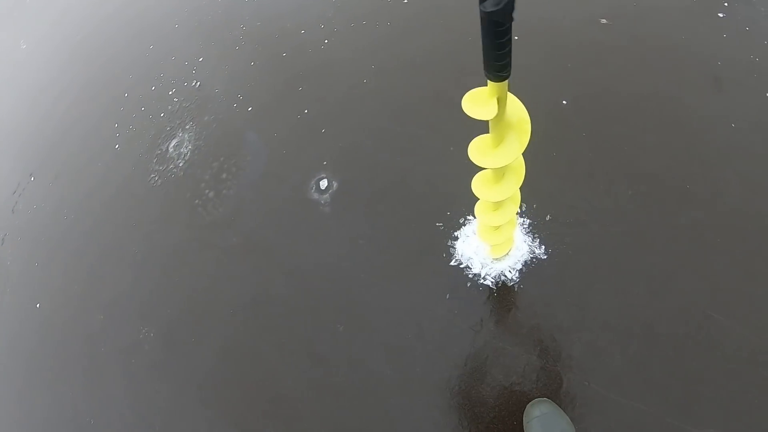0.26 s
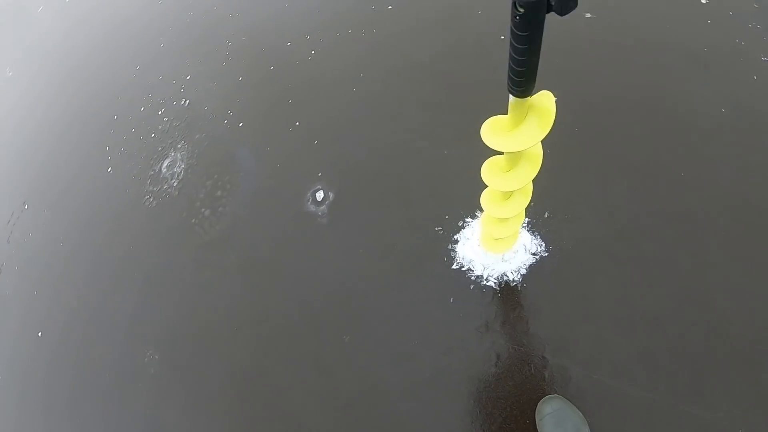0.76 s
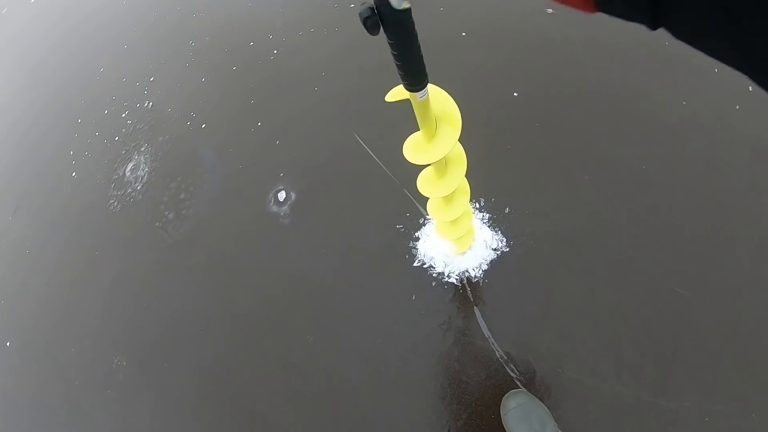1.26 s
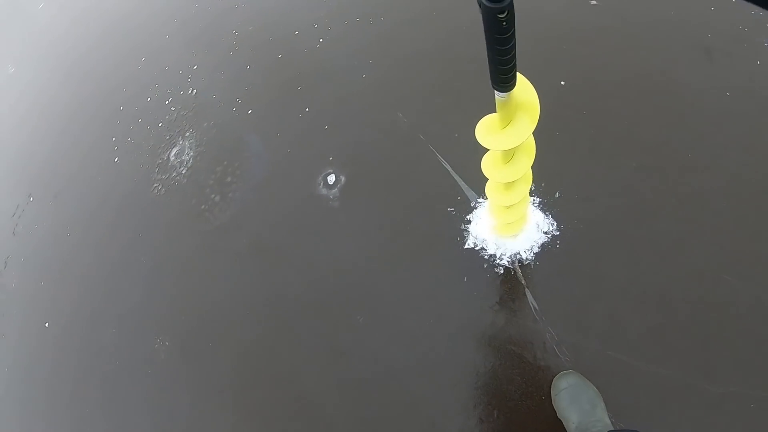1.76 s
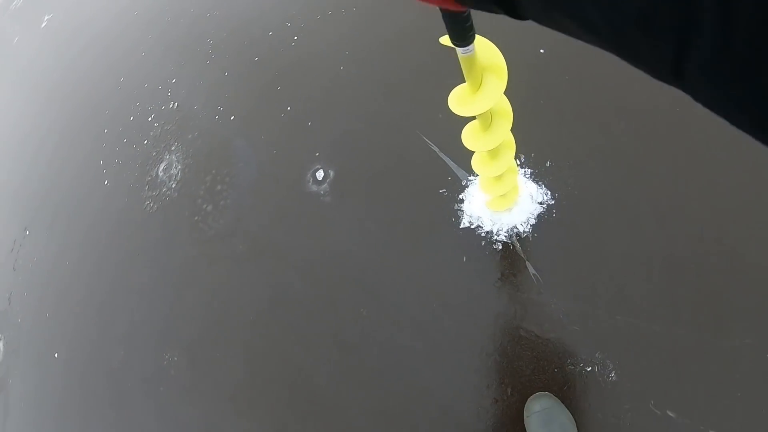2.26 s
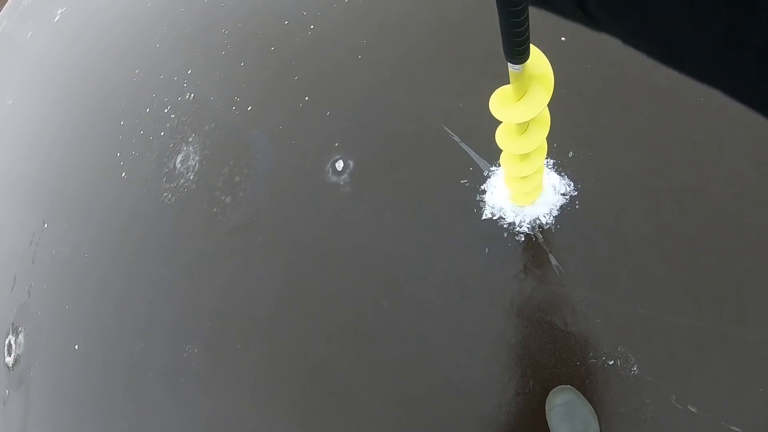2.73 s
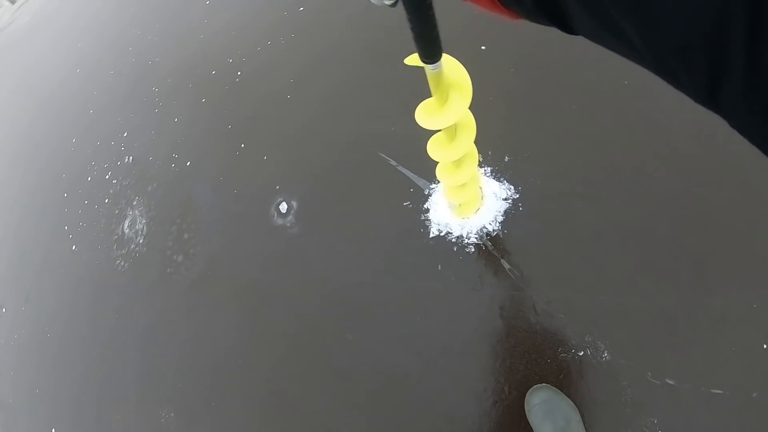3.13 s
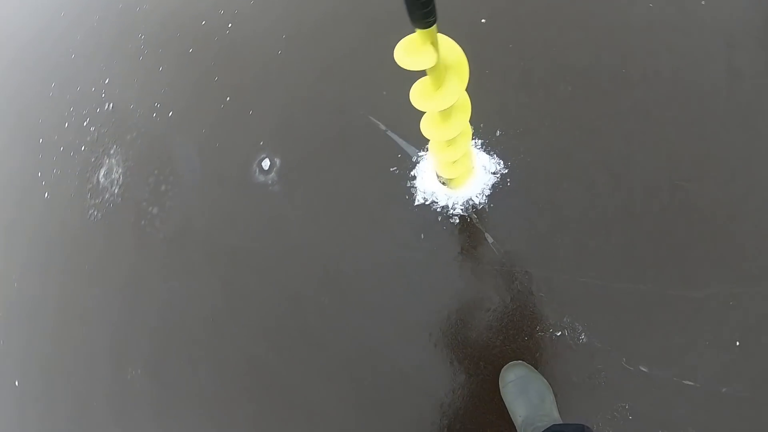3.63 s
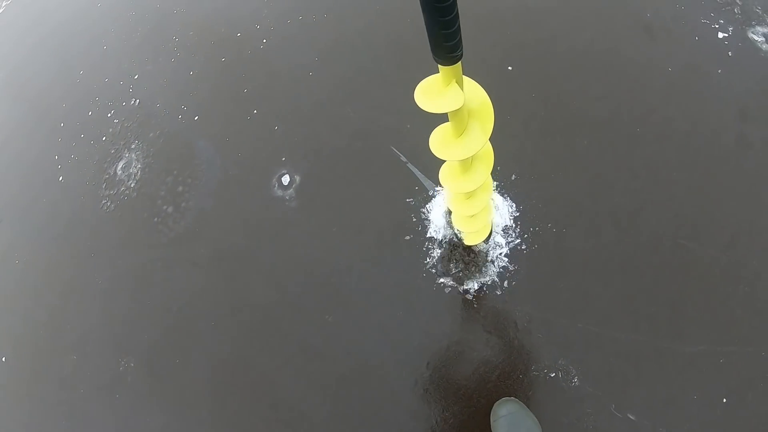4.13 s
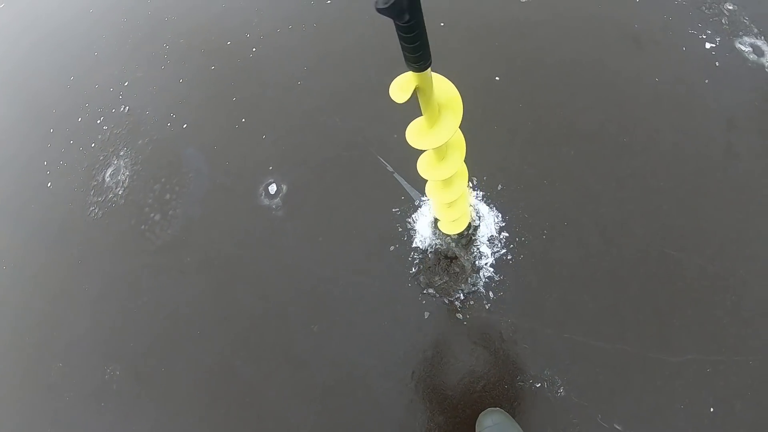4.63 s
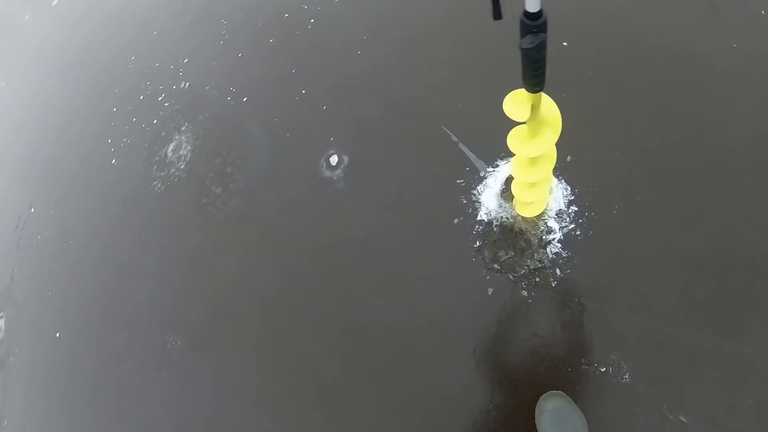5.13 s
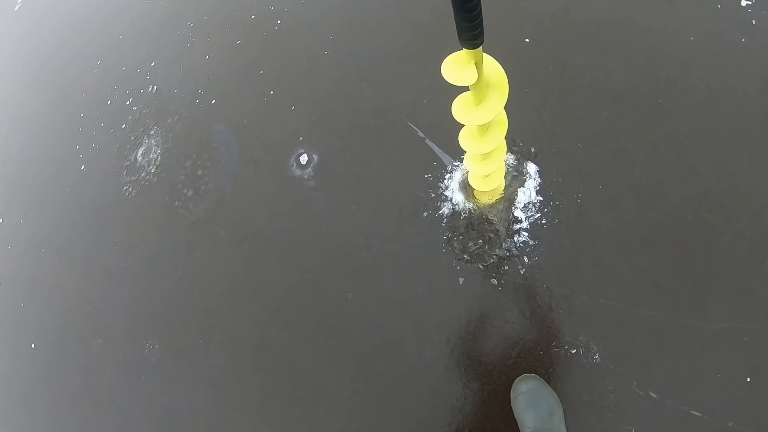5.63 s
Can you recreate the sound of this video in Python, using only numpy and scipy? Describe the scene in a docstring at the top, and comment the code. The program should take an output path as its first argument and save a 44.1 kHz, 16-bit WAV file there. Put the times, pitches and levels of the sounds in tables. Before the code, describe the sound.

A hand auger grinds through thin lake ice, then crunches and churns in slush and water, with small metallic clinks.

```python
"""Hand auger through lake ice

Close by, still day. For 1.5 s the blades chip thin ice and ring the steel spiral. The auger then
breaks through, churns water and slush, crunches against the rim and is lifted, splashing.
Ice: random fracture impulses through resonant filters. Thumps, bubbles, edge catches: enveloped sines."""
import sys
import numpy as np
from scipy import signal
from scipy.fft import rfft, irfft
from scipy.io import wavfile
from scipy.ndimage import uniform_filter1d

SR = 44100
rng = np.random.default_rng(int(sys.argv[2]) if len(sys.argv) > 2 else 0)


def waveform_to_disk(signal):
    """Save audio, clipped to [-1, 1], as 16-bit WAV at the path in sys.argv[1]."""
    frames = np.transpose(np.atleast_2d(signal))
    scaled = np.clip(frames, -1, 1) * 32767
    samples = np.round(scaled).astype(np.int16)
    wavfile.write(sys.argv[1], SR, samples)


N = 259296
TIME_S = np.arange(N) / SR

# Event and envelope levels are before layer gain.
# blades cutting: t/s, chip level/dB, shaving level/dB
CUT_LEVELS = [(0.0, -17, -30), (0.008, -23.5, -34.5), (0.206, -28, -39.5), (0.304, -25.5, -32.5),
              (0.436, -22.5, -38), (0.55, -26, -34), (0.752, -23, -36.5), (0.906, -25, -32.5),
              (0.972, -26, -37.5), (0.99, -25.5, -30.5), (1.062, -25.5, -37), (1.206, -23, -36.5),
              (1.248, -22.5, -40.5), (1.282, -25.5, -34), (1.32, -26, -38), (1.494, -28, -36.5),
              (1.52, -31.5, -39.5)]
# ice giving way: t/s, rise/s, body level/dB, crunch level/dB, splinter level/dB
CRUNCHES = [(0.07, .001, -47, -15.5, -40), (.149, 0.0019, -39, -46, -33), (0.24, 0.0011, -55, -21, -50),
            (0.383, 0.0022, -28, -20.5, -33), (0.403, 0.0025, -48, -19, -31),
            (0.419, 0.0028, -49, -27, -46), (0.435, 0.0012, -45, -14.5, -43),
            (0.472, 0.0036, -27.5, -27, -28.5), (0.756, 0.0018, -46, -21, -42),
            (0.812, 0.0013, -33, -17, -39), (1.112, 0.0007, -59, -8, -30), (.983, 0.0032, -47, -36, -31),
            (1.196, 0.003, -37, -43, -30), (1.278, 0.0053, -32.5, -21, -29),
            (1.608, 0.0045, -50, -35, -45.5), (1.654, 0.0053, -49, -35.5, -44),
            (1.692, 0.0042, -42, -27, -47), (1.711, 0.0042, -60, -27.5, -31.5),
            (1.949, 0.0093, -30.5, -37.5, -55), (1.98, 0.0045, -23.5, -38, -37),
            (2.387, 0.0062, -45, -35.5, -46), (2.44, 0.014, -33, -32, -38.5),
            (2.478, .004, -42, -23.5, -22.5), (2.489, 0.01, -37, -27, -30.5),
            (2.593, 0.0021, -41, -27.5, -34.5), (2.608, 0.0095, -58, -34, -46),
            (2.681, 0.0036, -49, -37, -41), (2.759, .003, -37, -51, -37.5),
            (2.891, 0.0044, -63, -26, -28.5), (2.914, 0.0058, -52.5, -29, -35),
            (2.941, 0.0047, -73, -32.5, -36.5), (3.037, 0.0053, -51, -27.5, -30.5),
            (3.076, 0.0044, -77, -34, -45), (3.166, 0.0072, -42, -34.5, -46),
            (3.307, .0036, -36.5, -35, -45), (3.659, 0.0052, -36.5, -28.5, -31),
            (3.708, 0.01, -60, -25.5, -31.5), (4.665, 0.0041, -38.5, -33.5, -45.5),
            (4.747, 0.0033, -32, -34, -56), (4.756, 0.0076, -33.5, -30, -50),
            (4.83, 0.0094, -33.5, -30.5, -42), (4.884, 0.0079, -31, -27, -42),
            (4.918, 0.0074, -40, -26.5, -33), (5.049, .004, -33, -34.5, -64),
            (5.078, 0.0093, -46, -38, -45.5), (5.148, 0.0026, -45, -31, -39),
            (5.157, 0.0055, -58, -25, -33), (5.188, 0.0036, -60, -32, -34.5),
            (5.25, 0.0017, -52, -32.5, -41), (5.315, 0.0044, -62, -37, -42),
            (5.334, 0.0038, -45, -19.5, -28), (5.391, 0.0053, -44.5, -29.5, -37.5),
            (5.447, 0.0068, -29.6, -25, -36.5), (5.461, 0.0061, -39, -28, -53),
            (5.525, 0.0041, -25.5, -20.5, -33), (5.534, 0.0047, -31, -18, -27),
            (5.644, 0.0039, -58, -32, -32), (5.703, 0.012, -31, -23.5, -33.5),
            (5.764, 0.0081, -39, -23, -27.5), (5.789, .01, -59, -25, -32)]
# edge catching: t/s, level/dB, favoured f/Hz, t60 multiplier
CATCHES = [(.49, -31, 3050, 2), (.828, -26, 2665, 2.6), (1.018, -26, 2665, 1.1), (1.499, -26, 2665, .7),
           (1.718, -23, 2150, .55), (1.72, -25, 2870, .4), (2.483, -20, 2670, .8), (2.484, -17.5, 5480, 1),
           (2.489, -19, 1795, 1.5), (2.894, -24, 1580, .6), (2.917, -17.5, 1400, .7),
           (3.039, -20, 1350, .8), (3.662, -24, 4530, .7), (3.716, -26.5, 2125, 1.1),
           (3.715, -35, 1470, 1.5), (3.713, -28.5, 4530, 1.6), (4.667, -22.5, 1500, .5),
           (4.924, -33, 2125, .8), (5.334, -14.5, 1800, .8), (5.53, -15.5, 1560, .8),
           (5.533, -25, 4530, 1.2), (5.612, -29, 1550, 3), (5.685, -23.5, 4530, 1), (5.711, -18.5, 4530, 1),
           (5.775, -26.5, 2125, 1.2), (5.783, -31, 4530, 2.4), (5.79, -24.5, 3300, 1)]
# splinters snapping: t/s, level/dB
SNAPS = [(0.472, -32), (1.6898, -43), (2.484, -21.5), (2.5926, -43), (2.6824, -32), (2.84, -39),
         (2.894, -21.5), (3.039, -47), (3.49, -48), (3.5363, -43), (4.4667, -51), (4.888, -33),
         (5.159, -33), (5.3335, -34), (5.447, -33.5)]
# loose ice swept along the wall: t/s, length/s, grit level/dB, hiss level/dB, sizzle level/dB
SCRAPES = [(1.604, 0.2, -40.5, -47, -59), (1.89, 0.31, -40.5, -47, -62), (2.164, .16, -40.5, -50, -78),
           (2.352, 0.21, -39.5, -44.5, -74), (2.545, 0.088, -36.5, -42.5, -58),
           (2.661, 0.15, -39.5, -42.5, -56), (2.833, .14, -38.5, -39, -50), (3, 0.23, -41.5, -44.5, -63),
           (3.27, 0.12, -44.5, -52, -70), (3.505, 0.14, -46.5, -50.5, -63),
           (3.588, 0.22, -33.5, -41.5, -61), (3.754, 0.46, -52.5, -57, -62), (3.985, 0.23, -69, -61, -76),
           (4.357, 0.2, -53, -60, -90), (4.563, 0.12, -46, -46.5, -70), (4.646, 0.27, -41, -49, -70),
           (4.828, 0.2, -36, -48, -52), (5.02, 0.18, -42.5, -64, -68), (5.144, 0.1, -37, -46, -72),
           (5.308, 0.085, -36.5, -38, -79), (5.375, 0.2, -39, -47.5, -69), (5.594, 0.097, -30.5, -42, -54),
           (5.673, 0.066, -32, -43, -79), (5.76, .1, -37, -54, -74)]
# slush brushing the spiral: t/s, level/dB
SLUSH_LEVELS = [(1.56, -50), (1.78, -64), (2.38, -51), (2.55, -47.5), (3.34, -54.5), (3.71, -50),
                (4.22, -64), (4.64, -54.5), (4.83, -38.5), (5.41, -52.5), (5.6, -37), (5.88, -46)]
# water slopping: t/s, level/dB
SLOP_LEVELS = [(0.0, -62), (1.36, -35), (1.49, -40.5), (1.72, -44), (1.87, -42.5), (2.26, -50.5),
               (2.36, -39), (3.1, -49), (3.55, -44), (3.72, -42), (4.53, -57), (4.91, -32), (5.17, -52.5),
               (5.37, -49), (5.6, -39), (5.88, -42)]
# ice sheet heaving: t/s, level/dB
HEAVE_LEVELS = [(0.0, -52.5), (0.36, -42), (0.64, -52.5), (1.01, -47.5), (1.72, -56.5), (1.88, -47.5),
                (2.34, -57), (2.59, -49), (3.0, -52), (3.27, -49), (3.62, -46), (3.9, -54), (4.22, -50.5),
                (4.91, -51.5), (5.26, -61), (5.88, -46)]
# water thumps: t/s, f/Hz, level/dB, rise/s
THUMPS = [(0.161, 70, -32, 0.0074), (0.355, 110, -26, 0.0087), (0.863, 84.5, -21.5, 0.0046),
          (1.771, 78.5, -18.5, 0.0032), (1.804, 128, -31, 0.013), (2.258, 113, -35, 0.0058),
          (2.454, 60, -30, 0.008), (2.49, 125, -25, 0.0046), (2.527, 73, -24.5, 0.005),
          (2.86, 320, -30, 0.0023), (2.975, 41.2, -32, 0.011), (3.075, 48.7, -25, 0.0079),
          (3.39, 168, -33.5, 0.0086), (3.405, 276, -37, 0.016), (3.54, 190.5, -31, 0.0074),
          (3.567, 97, -31.5, 0.013), (3.677, 192, -27.5, 0.0038), (4.244, 64, -30.5, 0.01),
          (4.295, 79, -27.5, 0.005), (4.448, 48.6, -26, 0.0065)]
# bubbles: t/s, start f/Hz, level/dB, climb/(octaves per s), rise/s
BUBBLES = [(1.544, 720, -29, 3.4, 0.0016), (1.579, 706, -29.5, 3, 0.00095), (1.696, 1100, -24.5, 2, 0.0014),
           (1.766, 810, -33.5, 2, 0.0013), (1.864, 810, -35.5, 2.4, 0.001), (1.98, 1010, -21, 2, 0.00092),
           (1.979, 217, -22, 2, 0.0072), (3.311, 408, -37, 2, 0.0055), (4.36, 330, -38.5, 2, 0.0031),
           (4.749, 1010, -36, 2, 0.0013), (4.759, 735, -29, 2, 0.0044), (5.346, 1350, -33, 1.4, 0.0098),
           (5.448, 900, -18.5, 2, 0.0015), (5.462, 814, -27, 1.1, 0.0073),
           (5.548, 629, -25.5, 21.4, 0.0064), (5.722, 1148, -25.5, 3.1, 0.0084),
           (5.732, 1394, -30, 2.2, 0.011), (5.782, 890, -26, 2.2, 0.0047)]
# wet steel on ice: t/s, rise/s, f/Hz, level/dB
SWISHES = [(2.0, 0.046, 4950, -55.5), (3.99, 0.056, 4200, -55.5), (4.355, 0.0087, 4200, -58)]

# modes of the auger with its ice collar, and of the spiral: f/Hz, width/Hz, lift/dB
AUGER_MODES = [(452, 17.3, 5), (1026, 200, 3.5), (1214, 29, 4.5), (1453, 17.5, 7), (2160, 10, 8),
               (4590, 58, 3.5), (5480, 68, 8.5), (5910, 51, 10.5), (7300, 25, 7)]
STEEL_MODES = [(2031, 20, 6), (2483, 10, 6), (2668, 12, 15), (2975, 35, 9), (3091, 16, 8), (3416, 12, 6),
               (4980, 18, 6), (5473, 30, 3), (5726, 20, 5)]
# modes rung by a catch: f/Hz, level/dB, base t60/s
CATCH_MODES = [(1240, 3.5, .043), (1500, -6, 0.079), (1580, 6, 0.032), (1890, 3.5, 0.023), (2125, 1, 0.12),
               (2665, -0.5, 0.21), (3050, -5, 0.11), (3430, -7, 0.2), (4530, 6, 0.041), (5480, -0.5, 0.077)]

# spectral shapes: f/Hz, level/dB
CHIP_SPECTRUM = [(200, -17.5), (500, -6), (750, 0), (950, 1), (1300, -1), (1600, 1), (1850, -4),
                 (2400, -10), (3200, -26), (4200, -41), (8000, -88)]
SHAVING_SPECTRUM = [(1500, -30.5), (2800, 7), (3500, -1.5), (4300, 3), (5150, -1), (5600, -3), (6300, -4.5),
                    (7000, -16.5), (8300, -16.5), (10000, -48), (11200, -63), (15800, -56)]
GRIT_SPECTRUM = [(200, -10), (500, -9), (800, 0.5), (1150, 3), (1550, 4), (2100, 1.5), (2500, -2.5),
                 (3000, -10.5), (3500, -19.5), (4500, -4.5), (8000, -107)]
HISS_SPECTRUM = [(1500, -38), (2800, 4), (3500, 2), (4400, 3.5), (5150, 3.5), (5600, 2.5), (6300, 2),
                 (7000, -11), (8300, -12), (10000, -29), (11200, -106), (12500, -16.5), (15800, -83)]
SNAP_SPECTRUM = [(1000, -62), (3000, -38), (5000, 9), (6300, 17), (8300, 6), (10000, -6.5), (12500, -5),
                 (15800, -11)]
BODY_SPECTRUM = [(70, -31.5), (140, 6), (200, 4.5), (300, 0), (450, -2), (650, -4.5), (900, -17.5),
                 (2000, -66.5)]
RUMBLE_SPECTRUM = [(10, -27), (28, 1.5), (70, 0), (150, -7.5), (220, -6), (500, -57)]
SPRAY_SPECTRUM = [(200, -1), (800, -10), (2000, -22), (4500, -1), (6300, 0.5), (8000, -13), (10500, -15),
                  (12500, 2), (15800, -7.5)]
LAKE_SPECTRUM = [(20, 27), (200, -10), (600, -29), (2000, -21), (5500, -29), (7500, -38), (11000, -95),
                 (16000, -69)]


def cutting(flaking_db=-24.5, flaking_exponent=1.25):
    """Blades stick and slip, freeing chips and shavings; a hard bite lifts whole flakes."""
    chip, shave = envelopes(CUT_LEVELS)
    bite = chip * (chip / from_db(flaking_db)) ** flaking_exponent
    slip = unit_rms(flutter(rate_hz=300, spread_db=1.55))
    modes = AUGER_MODES + STEEL_MODES
    chips = resonate(chip * slip * fractures(per_s=3200, spread_db=1.5), CHIP_SPECTRUM, modes)
    clumps = unit_rms(flutter(rate_hz=69.86, spread_db=2))
    flakes = pings(bite * clumps * fractures(per_s=700, spread_db=0), low_hz=926, high_hz=1560, q=73)
    shavings = resonate(shave * slip * fractures(per_s=16000, spread_db=2.5), SHAVING_SPECTRUM, modes)
    squeaks = pings(shave * fractures(per_s=130, spread_db=5), low_hz=4385, high_hz=4500, q=130)
    return (from_db(-1.5) * chips + from_db(-5.5) * flakes
            + from_db(1.5) * shavings + from_db(-8) * squeaks)


def crunches():
    """Avalanches of breaks shake the sheet and ring the auger."""
    power = np.zeros((3, N))
    for start_s, rise_s, *levels_db in CRUNCHES:
        span = slice(int(start_s * SR), int((start_s + 12 * rise_s) * SR))
        age = np.maximum(TIME_S[span] - start_s, 0) / rise_s
        power[:, span] += (from_db(levels_db)[:, None] * age * np.exp(1 - age)) ** 2
    body, crunch, splinter = np.sqrt(power)
    modes = AUGER_MODES + STEEL_MODES
    low = resonate(body * fractures(per_s=6000, spread_db=0.5), BODY_SPECTRUM)
    mid = resonate(crunch * fractures(per_s=6500, spread_db=3), GRIT_SPECTRUM, modes)
    high = resonate(splinter * fractures(per_s=9000, spread_db=5), HISS_SPECTRUM, modes)
    return low + from_db(-4) * mid + high


def catches(attack_s=0.0017, width_octaves=0.16):
    """Where an edge catches selects the modes; the grip of the ice sets their decay."""
    out, age_s = np.zeros(N + SR), TIME_S[:SR // 2]
    onset = 1 - np.exp(-age_s / attack_s)
    for start_s, level_db, favoured_hz, t60_scale in CATCHES:
        start = int(start_s * SR)
        for hz, mode_db, t60_s in CATCH_MODES:
            share = np.exp(-(np.log2(hz / favoured_hz) / width_octaves) ** 2 / 2)
            if share > 0.05:
                envelope = onset * from_db(level_db + mode_db - 60 * age_s / (t60_s * t60_scale))
                out[start:start + len(age_s)] += share * envelope * np.sin(2 * np.pi * hz * age_s)
    return out[:N] * flutter(rate_hz=140, spread_db=2.3)  # ice rubbing on the steel


def snaps(rise_s=0.0012):
    """Brittle splinters break off in short noise bursts."""
    force = sum(from_db(level_db) * swell(start_s, rise_s) for start_s, level_db in SNAPS)
    return from_db(-0.5) * resonate(force * rng.standard_normal(N), SNAP_SPECTRUM, AUGER_MODES)


def scrape_envelopes(attack_share=0.34, release_share=0.53):
    """Grit, hiss and sizzle gains; one trapezoid per sweep of the spiral."""
    out = np.zeros((3, N))
    for start_s, length_s, *levels_db in SCRAPES:
        span = slice(int(start_s * SR), int((start_s + length_s) * SR))
        progress = (TIME_S[span] - start_s) / length_s
        ramps = np.minimum(progress / attack_share, (1 - progress) / release_share)
        out[:, span] += from_db(levels_db)[:, None] * np.clip(ramps, 0, 1)
    return out


def scraping():
    """Chips and slush grind on the wall in clumps and plink in the water, too softly to ring the steel."""
    grit, hiss, _ = scrape_envelopes()
    slush, = envelopes(SLUSH_LEVELS)
    grit = np.hypot(grit, from_db(0.5) * slush)
    hiss = np.hypot(hiss, from_db(-4) * slush)
    grit_clumps = grit * unit_rms(flutter(rate_hz=160, spread_db=2))
    coarse = resonate(grit_clumps * fractures(per_s=2200, spread_db=2), GRIT_SPECTRUM, AUGER_MODES)
    hiss_clumps = hiss * unit_rms(flutter(rate_hz=120, spread_db=2))
    fine = resonate(hiss_clumps * fractures(per_s=8500, spread_db=3.5), HISS_SPECTRUM, AUGER_MODES)
    plinks = pings(grit * fractures(per_s=170, spread_db=5.5), low_hz=663, high_hz=2207, q=37)
    return from_db(-5) * coarse + from_db(-3) * fine + from_db(-8) * plinks


def churning():
    """Water slops harder with each cut and scrape; the sheet rumbles as it heaves and is scraped."""
    unrest, = envelopes(SLOP_LEVELS)
    heave, = envelopes(HEAVE_LEVELS)
    chip, grit = envelopes(CUT_LEVELS)[0], scrape_envelopes()[0]
    stir = np.hypot(from_db(1) * unrest, from_db(-13) * chip + from_db(-1) * grit)
    shake = np.hypot(from_db(5) * heave, from_db(-9) * grit) * flutter(rate_hz=16, spread_db=2)
    slop = resonate(stir * fractures(per_s=900, spread_db=3.5), BODY_SPECTRUM, AUGER_MODES)
    rumble = resonate(shake * rng.standard_normal(N), RUMBLE_SPECTRUM)
    return from_db(-4.5) * slop + rumble


def thumps():
    """The plug of water in the hole heaves for a few cycles."""
    return sum(-from_db(level_db) * swell(start_s, rise_s) * np.sin(2 * np.pi * hz * (TIME_S - start_s))
               for start_s, hz, level_db, rise_s in THUMPS)


def bubbles():
    """Trapped bubbles ring, climbing in pitch as they near the surface."""
    out = np.zeros(N)
    for start_s, hz, level_db, octaves_per_s, rise_s in BUBBLES:
        start = int(start_s * SR)
        age_s = TIME_S[:min(N - start, SR // 12)]
        phase = 2 * np.pi * np.cumsum(hz * 2 ** (octaves_per_s * age_s)) / SR
        envelope = from_db(level_db) * age_s / rise_s * np.exp(1 - age_s / rise_s)
        out[start:start + len(age_s)] += envelope * np.sin(phase)
    return out


def swishes(width_hz=340):
    """Wet steel rubs smoothly on ice: narrow-band noise."""
    out = np.zeros(N)
    for start_s, rise_s, hz, level_db in SWISHES:
        band = signal.lfilter(*signal.iirpeak(hz, hz / width_hz, fs=SR), rng.standard_normal(N))
        out += from_db(level_db) * swell(start_s, rise_s) * unit_rms(band)
    return out


def spray(ice, exponent=0.89):
    """Faint scatter following the compressed treble envelope of the ice."""
    treble = highpass(ice, cutoff_hz=5500, order=4)
    treble_rms = np.sqrt(np.abs(uniform_filter1d(treble ** 2, size=130)))
    return from_db(-27) * resonate(treble_rms ** exponent * rng.standard_normal(N), SPRAY_SPECTRUM)


def sizzle():
    """Wet ice sizzles in the top octave with each cut and scrape, independently per channel."""
    envelope = scrape_envelopes()[2] + from_db(-21.5) * envelopes(CUT_LEVELS)[1]
    grains = np.array([fractures(per_s=8000, spread_db=6) for _ in range(2)])
    return envelope * unit_rms(highpass(grains, cutoff_hz=11900, order=8))


def lake(level_db=-79):
    """Steady low background noise."""
    return from_db(level_db) * resonate(rng.standard_normal(N), LAKE_SPECTRUM)


def fractures(per_s, spread_db):
    """Tiny breaks as random impulses, many small and few large; unit RMS."""
    sizes = from_db(spread_db * np.minimum(rng.exponential(1, N), 3.5))
    return unit_rms(sizes * rng.choice([-1, 1], N) * (rng.random(N) < per_s / SR))


def resonate(force, spectrum, modes=(), size=16384):
    """Force through a body: broad spectrum plus resonances, unit-energy impulse response."""
    hz = np.arange(size // 2 + 1) * SR / size + 1e-3
    knots_hz, knots_db = np.transpose(spectrum)
    magnitude = from_db(np.interp(np.log(hz), np.log(knots_hz), knots_db))
    cepstrum = irfft(np.log(magnitude))
    cepstrum[1:size // 2] *= 2  # minimum phase: no pre-ringing
    peaks = 1 + sum((from_db(lift_db) - 1) / (1 + 1j * (hz ** 2 - mode_hz ** 2) / (hz * width_hz))
                    for mode_hz, width_hz, lift_db in modes)
    impulse = irfft(np.exp(rfft(cepstrum[:size // 2], size)) * peaks)
    return signal.fftconvolve(force, impulse / np.sqrt(np.sum(impulse ** 2)))[:N]


def pings(force, low_hz, high_hz, q, count=14):
    """Each break rings one resonator at random; power is preserved."""
    choice, out = rng.integers(0, count, N), np.zeros(N)
    for k, hz in enumerate(np.geomspace(low_hz, high_hz, count)):
        ring = signal.lfilter(*signal.iirpeak(hz, q, fs=SR), force * (choice == k) + 1e-18)
        out += ring * np.sqrt(q * SR / (np.pi * hz))
    return out


def envelopes(rows, fade_s=0.03):
    """One gain curve per level column, fading out beyond the table's span."""
    times_s, *columns_db = np.transpose(rows)
    gate = np.clip(np.minimum(TIME_S - times_s[0], times_s[-1] - TIME_S) / fade_s + 1, 0, 1)
    return [gate * from_db(np.interp(TIME_S, times_s, levels_db)) for levels_db in columns_db]


def flutter(rate_hz, spread_db):
    """Random gain wandering about 0 dB."""
    wander = np.interp(TIME_S * rate_hz, np.arange(N), rng.standard_normal(N))
    return from_db(spread_db * unit_rms(wander))


def swell(start_s, rise_s):
    """Pulse peaking at 1 after rise_s, then decaying."""
    age = np.clip((TIME_S - start_s) / rise_s, 0, 40)
    return age * np.exp(1 - age)


def highpass(x, cutoff_hz, order):
    return signal.sosfilt(signal.butter(order, cutoff_hz, "high", fs=SR, output="sos"), x)


def from_db(db):
    return 10 ** (np.asarray(db) / 20)


def unit_rms(x):
    return x / np.sqrt(np.mean(x ** 2) + 1e-20)


def scene():
    """Hole straight ahead; only spray and sizzle spread to the sides."""
    ice = cutting() + scraping() + crunches() + snaps() + catches()
    centre = ice + lake() + churning() + thumps() + bubbles()
    side = spray(ice) * np.array([[1], [-1]])
    return centre + side + sizzle() + swishes()


def record(dry):
    """Microphone: narrow top-octave dip, steep treble cut."""
    notch_hz, cutoff_hz = 11150, 15800
    notched = signal.lfilter(*signal.iirnotch(notch_hz, Q=9, fs=SR), dry)
    return signal.sosfilt(signal.ellip(10, 0.1, 80, cutoff_hz, fs=SR, output="sos"), notched)


dry = scene()
out = record(dry)
waveform_to_disk(out)
```